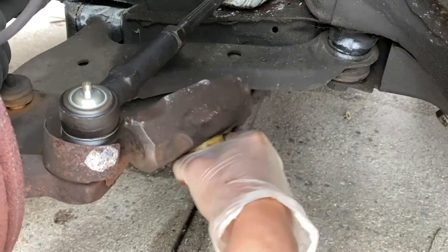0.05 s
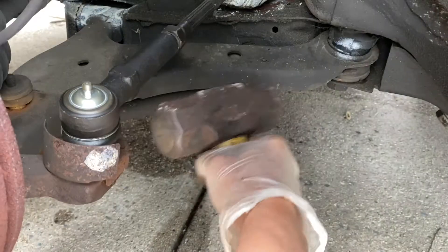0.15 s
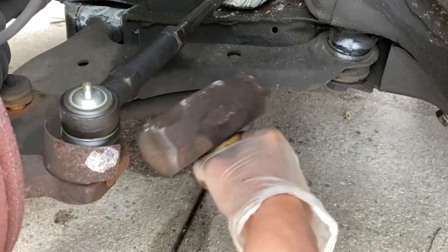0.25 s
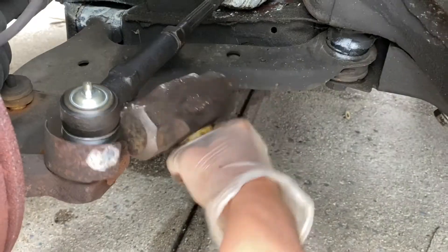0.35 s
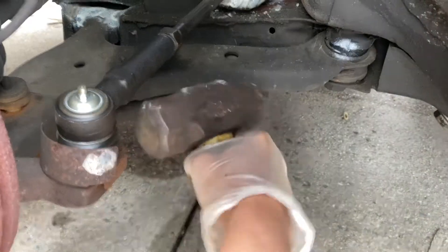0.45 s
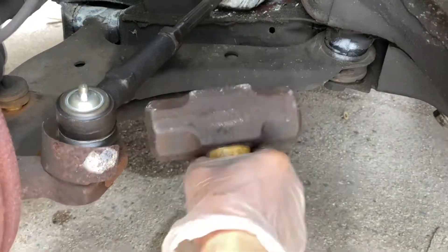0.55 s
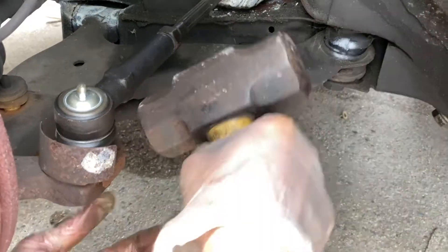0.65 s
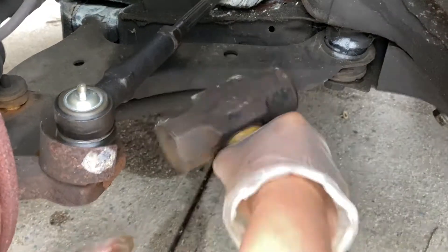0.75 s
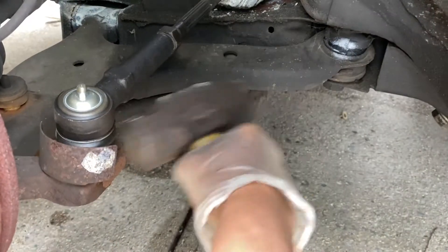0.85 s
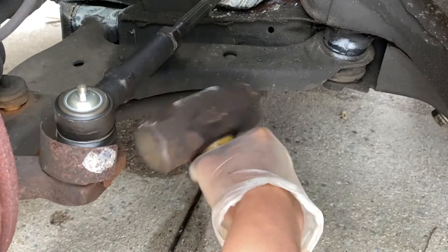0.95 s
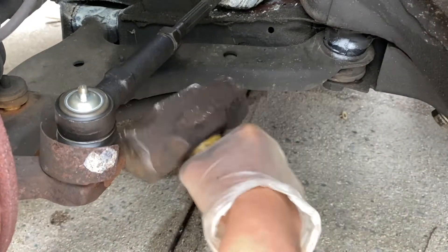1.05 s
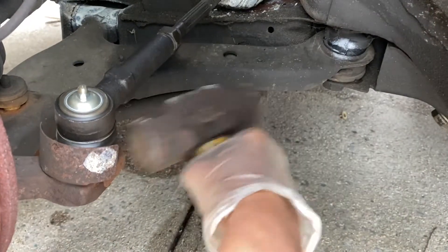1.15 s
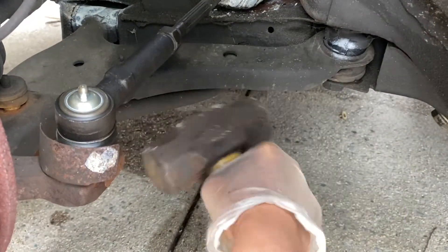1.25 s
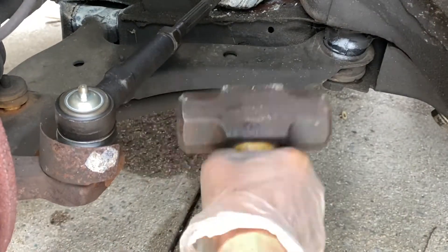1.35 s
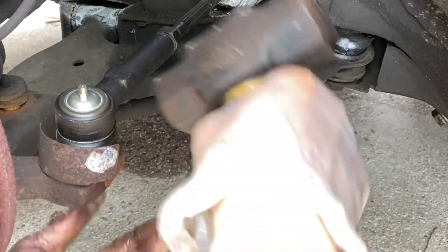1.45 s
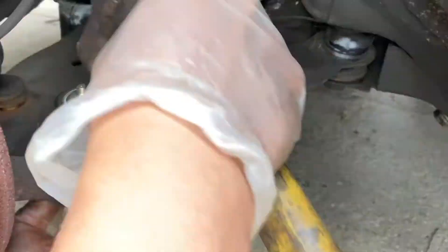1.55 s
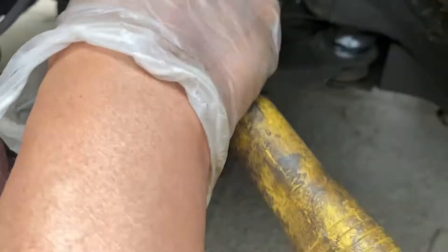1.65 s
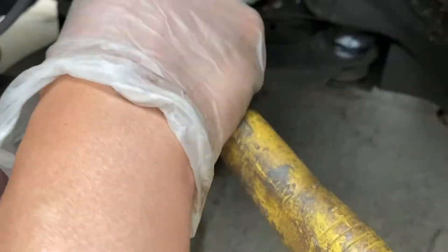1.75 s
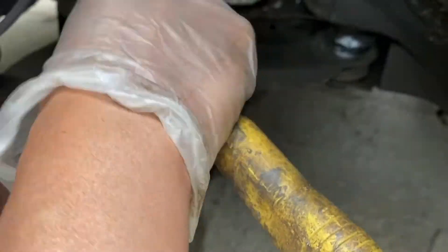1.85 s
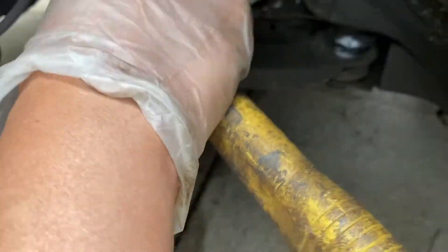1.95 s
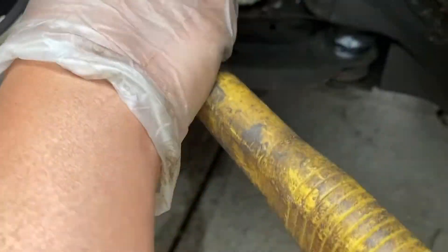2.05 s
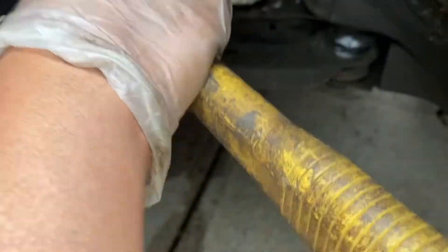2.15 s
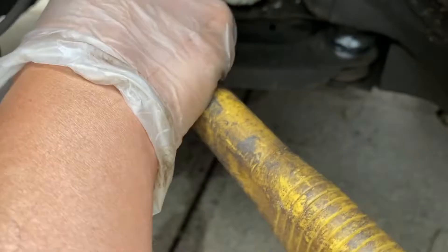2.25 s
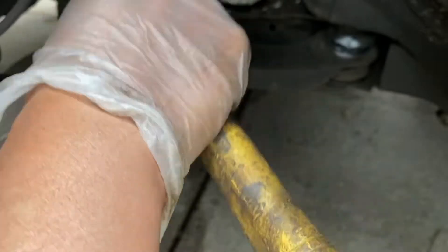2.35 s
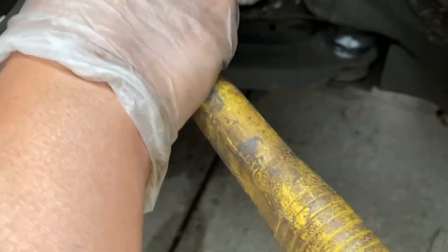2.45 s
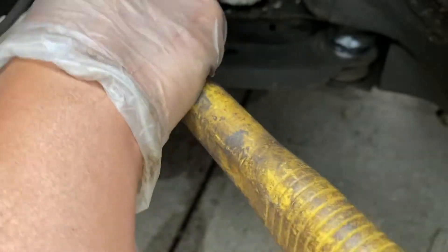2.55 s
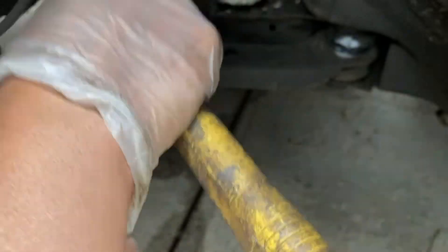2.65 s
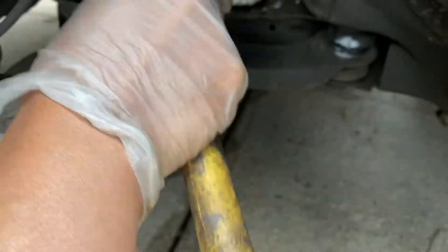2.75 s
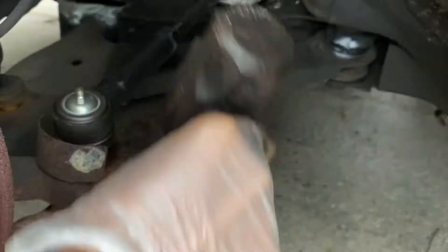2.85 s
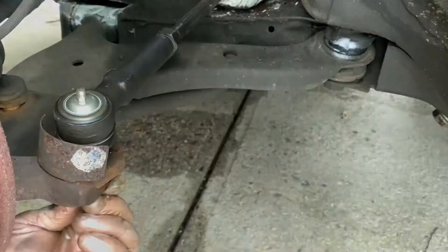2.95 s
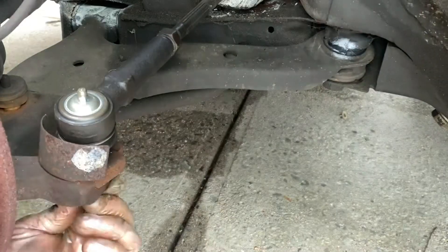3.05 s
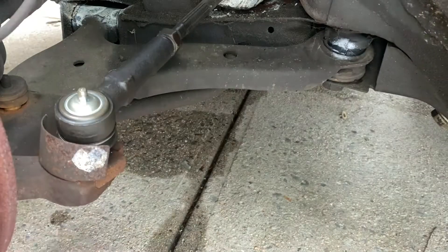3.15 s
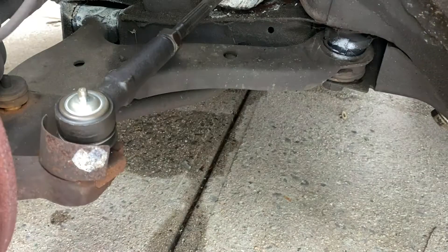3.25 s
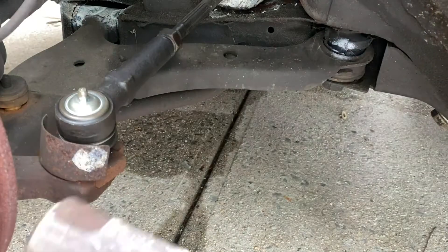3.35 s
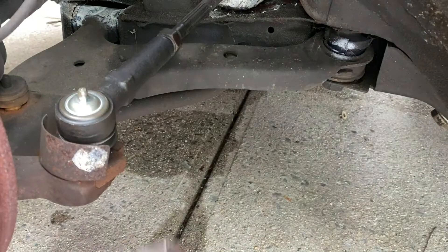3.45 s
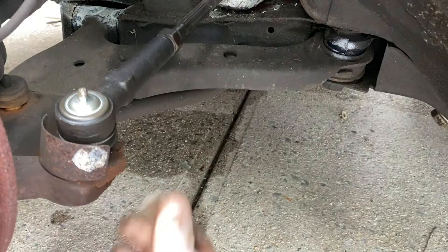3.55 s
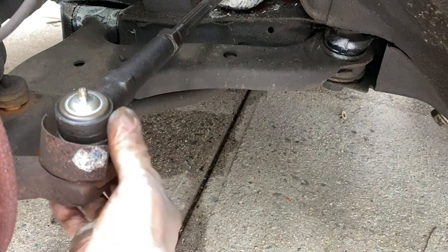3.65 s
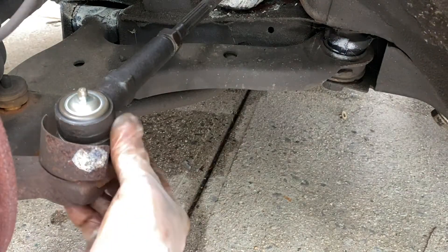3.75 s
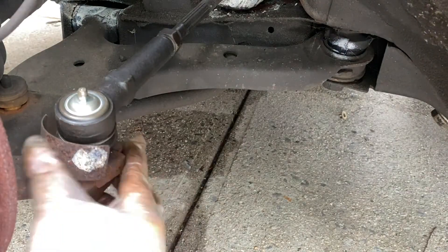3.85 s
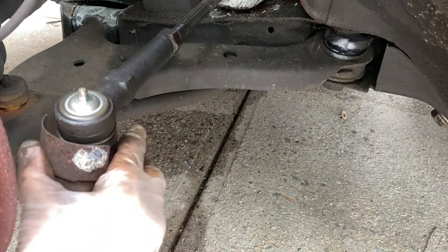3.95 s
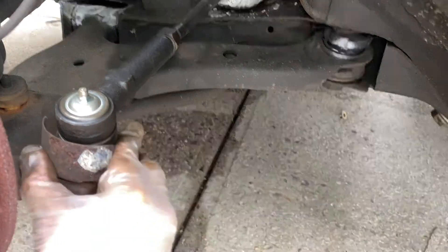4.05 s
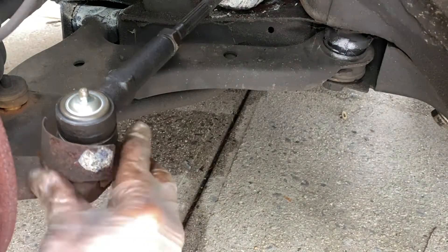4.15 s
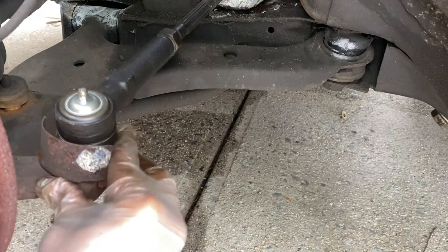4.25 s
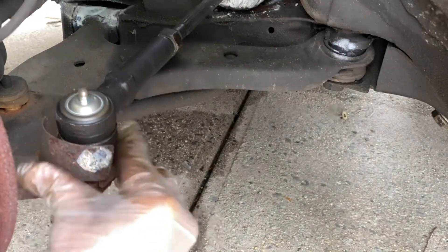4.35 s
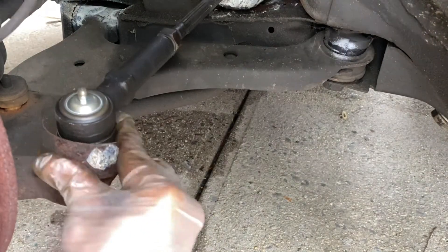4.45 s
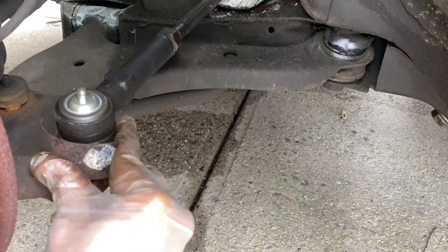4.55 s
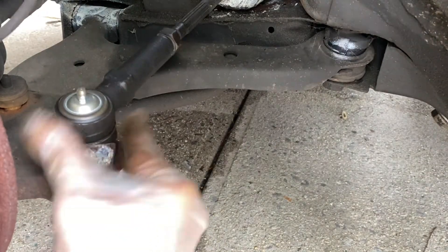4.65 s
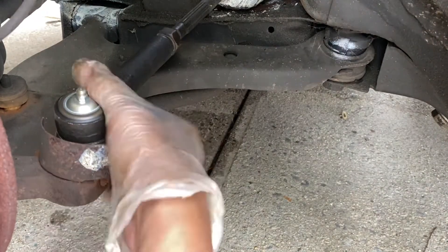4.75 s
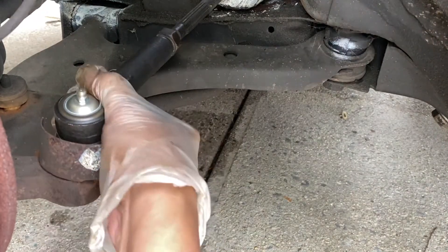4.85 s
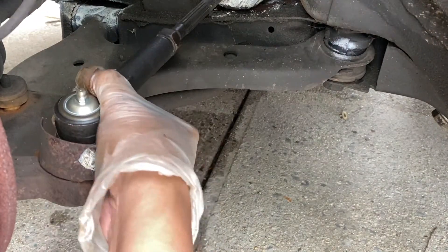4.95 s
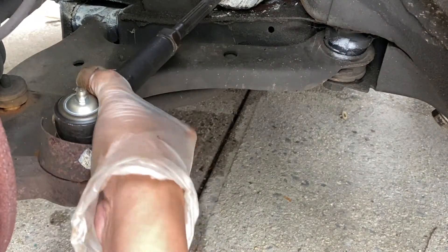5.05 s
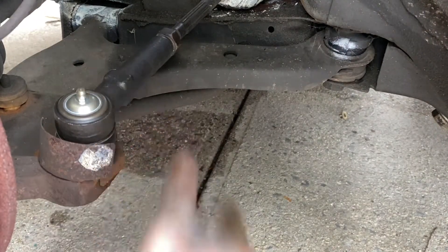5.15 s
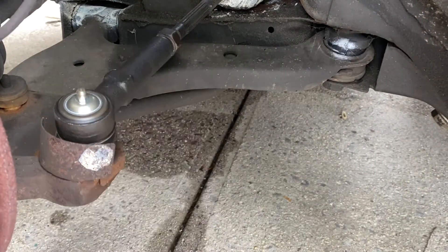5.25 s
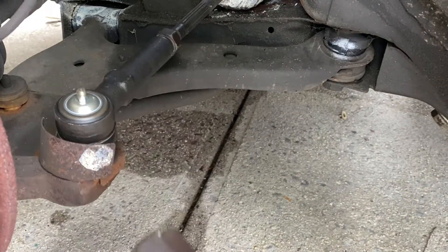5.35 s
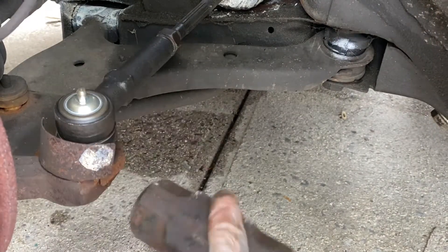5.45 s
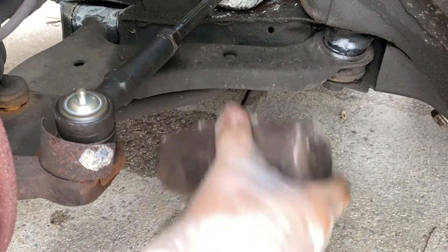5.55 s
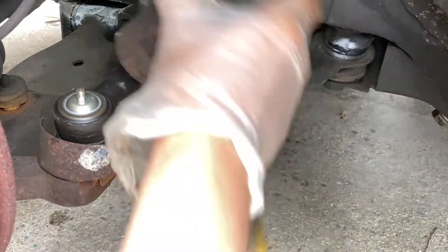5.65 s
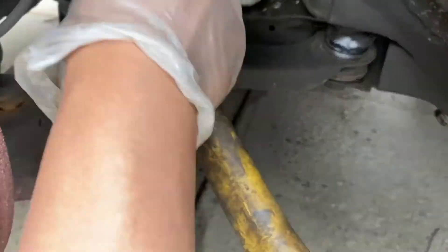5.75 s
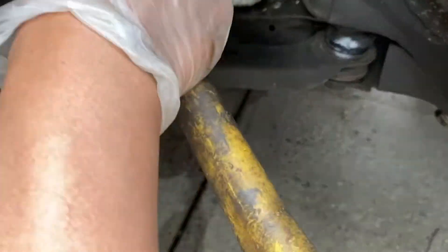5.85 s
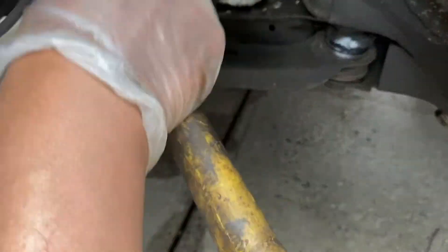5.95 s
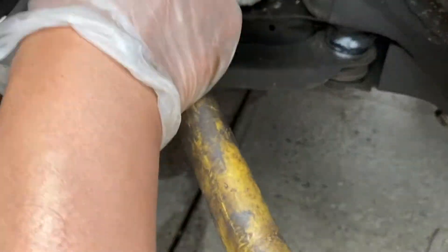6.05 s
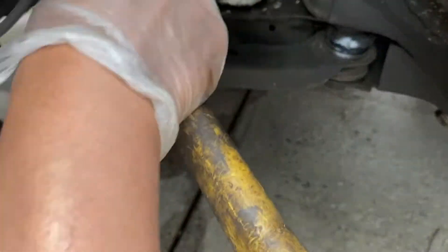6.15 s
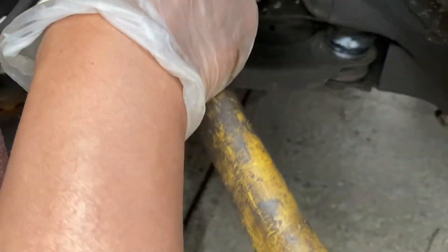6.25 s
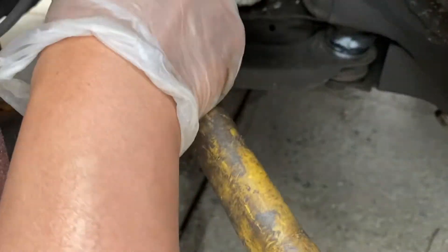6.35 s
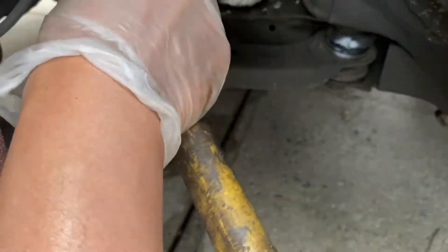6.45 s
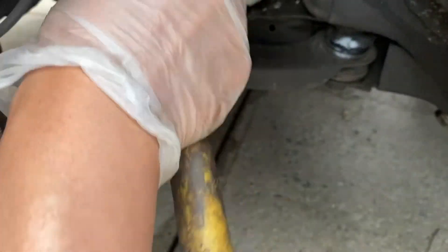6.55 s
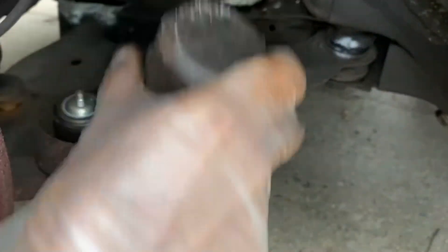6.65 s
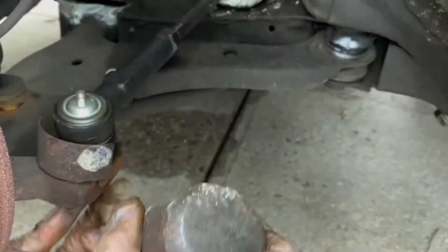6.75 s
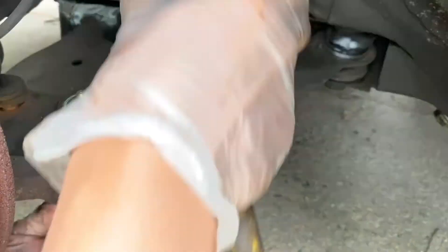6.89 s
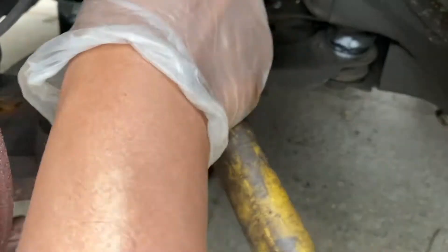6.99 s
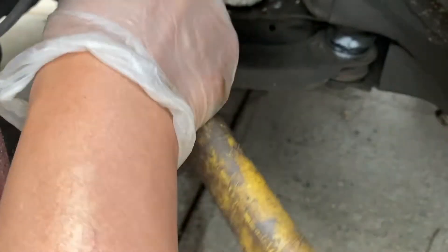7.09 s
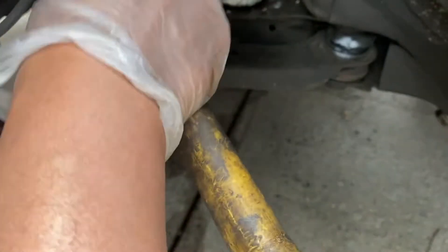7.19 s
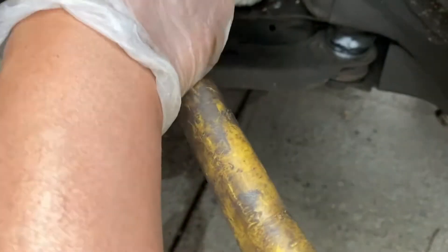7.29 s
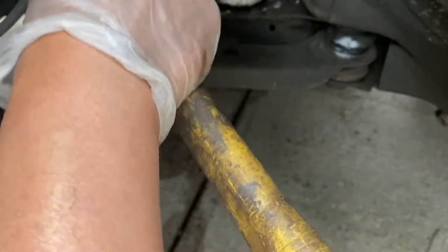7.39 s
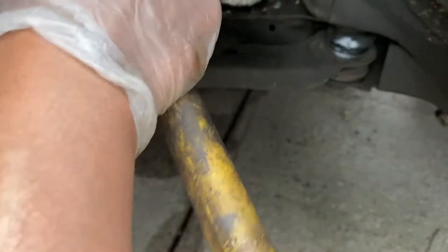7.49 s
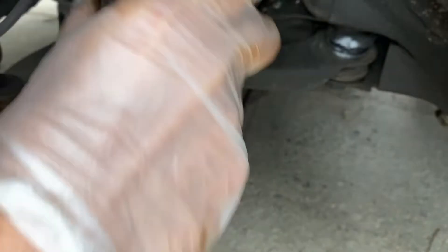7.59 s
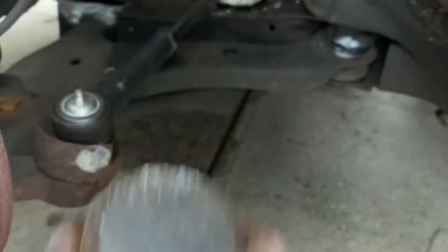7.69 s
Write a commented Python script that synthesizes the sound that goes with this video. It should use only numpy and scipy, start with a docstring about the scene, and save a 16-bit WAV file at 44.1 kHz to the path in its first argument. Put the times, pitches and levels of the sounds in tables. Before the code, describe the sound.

Hard bright clangs of hammer on a heavy steel car part open the scene in two groups of three, distorting the close microphone. Quick light taps mixed with dull, chattering knocks come next. Then the tapping stops for quiet glove rustle, short rubbery rubs and tiny squeaks. A dull knock leads into four light taps, soft handling, and three last taps over faint room air.

```python
"""In a garage, beside a car's wheel well: a small sledge hammer on the steering knuckle, very close to the microphone.
Six hard ringing blows come first, then runs of light taps with a few dull, chattering knocks.
Damped modes ring the steel, noise bursts give the crack, and the wheel well adds a short dense tail.
Around the runs a gloved hand rubs and feels the joint, made of swells of grainy noise, pops and faint squeaks.
Quiet coloured noise is the room; the microphone clips the loud peaks, and the sound cuts out once, briefly."""
import sys
import numpy as np
from scipy import signal
from scipy.fft import rfft, irfft
from scipy.io import wavfile
from scipy.ndimage import uniform_filter1d

SR = 44100
rng = np.random.default_rng(int(sys.argv[2]) if len(sys.argv) > 2 else 0)


def wav_out(sig):
    """Save sig, one row per channel (or a flat mono array), as 16-bit PCM at SR to the path in sys.argv[1]."""
    wavfile.write(sys.argv[1], SR, np.round(np.clip(np.atleast_2d(sig).T, -1, 1) * 32767).astype(np.int16))


N = 340496
TIME = np.arange(N) / SR
AGE = TIME[:SR // 3]  # seconds since a contact
MIDDLE = AGE[-1] / 2  # where a stroke peaks, in seconds


def undb(db):
    """Decibels to gain."""
    return 10 ** (np.asarray(db) / 20)


def noise(t):
    """White noise as long as t."""
    return rng.standard_normal(len(t))


def colour(x, points, treble_db=0, bass_db=0):
    """Give a white signal a spectrum at the same power, then shelve its treble and bass."""
    f = np.fft.rfftfreq(len(x), 1 / SR) + 1  # 1 Hz up, to keep the logarithm finite
    hz, db = np.transpose(points)
    gain = undb(np.interp(np.log(f), np.log(hz), db))
    gain /= np.sqrt(np.mean(gain ** 2))
    treble_shelf_db = treble_db * f ** 2 / (f ** 2 + 4500 ** 2)
    bass_shelf_db = bass_db / (1 + (f / 800) ** 2)
    return irfft(rfft(x) * gain * undb(treble_shelf_db + bass_shelf_db), len(x))


def grains(t, spread_db):
    """Dense tiny slips of very unequal size; rms 1."""
    sizes_db = spread_db * np.repeat(noise(t), 12)[:len(t)]  # each size holds for 12 samples
    x = noise(t) * undb(sizes_db)
    return x / np.std(x)


def swell(width, t=AGE - MIDDLE):
    """A rounded rise and fall that peaks at t = 0, halfway along a stroke."""
    return np.exp(-np.abs(t / width) ** 1.6)


def fade(t60):
    """Exponential decay after a contact, down 60 dB at t60 seconds."""
    return np.exp(-np.log(1000) * AGE / max(t60, 1e-3))


def onset(rise_s):
    """A rounded start that approaches full level over a few times rise_s."""
    return 1 - np.exp(-AGE / rise_s)


def ring(modes, scatter_db, detune):
    """Decaying modes; each contact lands on another spot and shares its energy out differently."""
    out = np.zeros(len(AGE))
    for hz, db, t60 in modes:
        level_chance, pitch_chance, phase = rng.standard_normal(3)
        cycles = hz * (1 + detune * pitch_chance) * AGE + phase
        out += undb(db + scatter_db * level_chance) * fade(t60) * np.sin(2 * np.pi * cycles)
    return out


def excite(x, modes, t60, contact_s=0.00064):
    """Drive a set of modes with x through a soft contact, at equal power."""
    timed_modes = [(hz, db, share * t60) for hz, db, share in modes]
    response = ring(timed_modes, scatter_db=1.5, detune=0) * onset(contact_s)
    return signal.fftconvolve(x, response / np.linalg.norm(response))[:len(x)]


def add(track, s, x):
    """Mix x into the track at time s."""
    i = max(int(s * SR), 0)
    track[i:i + len(x)] += x[:N - i]


# The still air of the garage. Each row: frequency in Hz, relative density in dB per Hz.
ROOM_SPECTRUM = [(25, -5), (60, 4.5), (150, 5.5), (300, 5.5), (600, 0), (1000, 1.5), (1700, 0.5),
                 (3000, -6), (4500, -13.5), (7000, -19.5), (11000, -25.5), (16000, -31)]


def room_air(level_db=-67.5):
    """Steady room noise, strongest in the bass and low middle."""
    return undb(level_db) * colour(noise(TIME), ROOM_SPECTRUM)


# Crinkling of the thin glove. Each row: frequency in Hz, relative density in dB per Hz.
CRINKLE_SPECTRUM = [(200, -8), (500, 3.5), (1000, 0), (3000, -3.5), (4500, -12.5), (7500, -13),
                    (11000, -20.5), (15500, -36.5)]
# Soft push on the joint. Each row: frequency in Hz, relative density in dB per Hz.
PUSH_SPECTRUM = [(20, -33), (50, 0.5), (100, 3.5), (200, 0), (400, -16.5), (1500, -34.5)]
# Modes of the knuckle and its arm. Each row: nominal frequency in Hz, mean level in dB,
# share of the contact's t60.
KNUCKLE_MODES = [(447, -17.5, 0.43), (602, -16, 0.62), (957.6, -16, 1), (1347.4, -19.5, 1),
                 (1450.6, -17, 0.99), (1716, -12, 0.74), (2072, -15.5, 0.73), (2753, -16.5, 0.53),
                 (3450, -10.5, 0.51), (3537, -13, 0.58), (4050, -13, 0.26), (4426, -21, 0.34),
                 (4827, -21.5, .7), (7000, -18.5, 0.35), (11120, -17.5, 0.31)]
# Movements of the hand. Each row: peak time in seconds, swell and fade time in seconds,
# crinkle level in dB, crinkle treble in dB, push level in dB.
HAND_MOVES = [(0.55, 0.031, -79.5, 15, -80), (2.31, 0.022, -66, 15, -70), (2.791, 0.042, -76.5, 12, -67),
              (2.939, .04, -69.5, 7, -74.5), (3.2, .03, -63.5, 4.5, -67), (3.38, 0.073, -65.5, 9.5, -59),
              (3.471, 0.041, -64.5, 4.5, -63), (3.855, 0.015, -59, 7, -50.5), (3.99, 0.29, -60.5, -7, -63),
              (4.889, .025, -66, 5.5, -74.5), (5.325, 0.014, -61, -2, -64.5),
              (5.378, 0.021, -57.5, 1.5, -56.5), (5.44, 0.027, -62, -1, -60), (6.781, .03, -69, 5, -74),
              (7.15, 0.19, -63, -12, -70), (7.544, 0.035, -57.5, -10, -58), (7.69, 0.12, -61.5, -3.5, -64)]


def handling(flutter_hz=35, flutter_db=2, steel_db=-13, steel_t60=0.099):
    """As the hand moves, the glove crinkles in uneven spurts and nudges the joint; the steel sings faintly."""
    knots = np.arange(0, TIME[-1], 1 / flutter_hz)
    spurts = np.interp(TIME, knots, rng.standard_normal(len(knots)))
    slips = undb(flutter_db * spurts) * grains(TIME, spread_db=5)
    crinkle = colour(slips, CRINKLE_SPECTRUM)
    high_pass = signal.butter(1, 4500, "high", fs=SR, output="sos")
    treble = signal.sosfiltfilt(high_pass, crinkle)
    bump = colour(noise(TIME), PUSH_SPECTRUM)
    rustle, push = np.zeros(N), np.zeros(N)
    for s, width, db, treble_db, push_db in HAND_MOVES:
        motion = swell(width, TIME - s)
        rustle += undb(db) * motion * (crinkle + (undb(treble_db) - 1) * treble)
        push += undb(push_db) * motion * bump
    steel = undb(steel_db) * excite(rustle, KNUCKLE_MODES, steel_t60)
    return rustle + push + steel


def twist(start_s=4.13, count=6, gap_s=0.058, quickening=0.88):
    """The hand twists the joint: the slips crowd together and brighten as the grip gives way."""
    width_s, level_db, treble_db, brightening_db = 0.021, -37.5, -0.5, 0.55
    strokes, s = [], start_s
    for k in range(count):
        strokes.append((s, width_s, level_db, treble_db + brightening_db * k))
        s += gap_s * quickening ** k
    return strokes


# Single strokes of the glove on the joint. Each row: peak time in seconds, swell and fade time in seconds,
# level in dB, treble in dB.
GLOVE_STROKES = [(3.127, 0.031, -36, 2.5), (3.168, 0.012, -37, 6), (4.46, 0.0059, -51.5, 3),
                 (4.528, 0.013, -45, 4), (4.791, 0.0073, -55, 3), (4.842, 0.012, -45, 7),
                 (5.16, 0.013, -47, 8.5), (5.512, 0.011, -49, 23), (6.426, 0.0096, -52, 5),
                 (6.725, 0.013, -56, -1)]
# Rubber rubbing on steel. Each row: frequency in Hz, relative density in dB per Hz.
RUB_SPECTRUM = [(40, -17), (130, 5.5), (250, 7.5), (400, 5), (650, -1.5), (1000, -6.5), (2000, -10),
                (2800, -9), (3700, -16), (5000, -26), (9000, -29), (15500, -42)]


def glove():
    """Short strokes of rubber slipping over steel, each a swell of tiny slips."""
    out = np.zeros(N)
    for s, width, db, treble_db in list(GLOVE_STROKES) + twist():
        slips = swell(width) * grains(AGE, spread_db=3.5)
        # a brighter stroke also has less bass
        stroke = colour(slips, RUB_SPECTRUM, treble_db, bass_db=-0.75 * treble_db)
        add(out, s - MIDDLE, undb(db) * stroke)
    return out


def judder(s=3.145, width=0.013, db=-22, slip_hz=172, jitter=0.1, pop_t60=0.018):
    """The glove grips and lets go a few times in a row; each slip gives a hollow, damped pop."""
    slips = np.zeros(len(AGE))
    times = np.cumsum(1 + jitter * rng.standard_normal(80)) / slip_hz
    slips[(times[times < AGE[-1]] * SR).astype(int)] = 1
    # neighbouring modes swing against each other, so the pop has little bass
    pop = np.zeros(len(AGE))
    for sign, hz in ((1, 300), (-1, 510), (1, 680)):
        pop += sign * np.sin(2 * np.pi * hz * AGE) * fade(pop_t60)
    out = np.zeros(N)
    add(out, s - MIDDLE, undb(db) * signal.fftconvolve(slips * swell(width), pop))
    return out


# Small crisp ticks of the fingers on the joint. Each row: start in seconds, level in dB, t60 in seconds,
# treble in dB.
FINGER_TICKS = [(1.583, -55.5, 0.061, 23), (2.916, -54, 0.07, 14.5), (3.212, -50, 0.059, 1),
                (4.038, -55, 0.049, 9.5), (4.392, -51.5, 0.013, 10), (5.402, -47, 0.02, 1)]


def ticks():
    """The glove snaps free of an edge: a fading burst of coloured noise."""
    out = np.zeros(N)
    for s, db, t60, treble_db in FINGER_TICKS:
        add(out, s, undb(db) * colour(noise(AGE), CRINKLE_SPECTRUM, treble_db) * fade(t60))
    return out


# Faint squeaks of rubber on steel. Each row: peak time in seconds, swell and fade time in seconds,
# mean pitch in Hz, level in dB.
RUBBER_SQUEAKS = [(3.46, .03, 903, -63), (3.67, .025, 915, -65), (3.835, 0.037, 925, -61)]


def squeaks(wobble=0.013, rolloff_db=-1.6, count=8):
    """A fingertip sticks and slips fast enough to sing, in harmonics of a wavering pitch."""
    out = np.zeros(N)
    for s, width, hz, db in RUBBER_SQUEAKS:
        drift = uniform_filter1d(noise(AGE), size=300)
        pitch = hz * (1 + wobble * drift / np.std(drift))
        phase = 2 * np.pi * np.cumsum(pitch) / SR
        tone = sum(undb(rolloff_db * k) * np.sin((k + 1) * phase) for k in range(count))
        add(out, s - MIDDLE, undb(db) * swell(width) * tone / np.std(tone))
    return out


# Low thumps as the microphone overloads at two hard blows and two dull knocks. Each row: start in seconds,
# level in dB.
OVERLOAD_THUMPS = [(1.009, -19), (1.164, -11.5), (1.4732, -29), (5.7335, -31.5)]
# Low tones of a thump. Each row: frequency in Hz, level in dB, t60 in seconds.
THUMP_MODES = [(48, -2.5, 0.06), (132, 1, 0.03)]


def thumps():
    """The microphone's overload adds a low thump under some contacts, as quickly damped low sines."""
    out = np.zeros(N)
    thump = sum(undb(db) * np.sin(2 * np.pi * hz * AGE) * fade(t60) for hz, db, t60 in THUMP_MODES)
    for s, db in OVERLOAD_THUMPS:
        add(out, s, undb(db) * thump)
    return out


# The dull body chattering after a contact. Each row: peak of the first burst in seconds, end of the series
# in seconds, gap between bursts in seconds, level in dB.
CHATTER_RUNS = [(1.567, 1.641, 0.0295, -44.5), (2.149, 2.215, 0.045, -47.5)]
# Modes of a dull knock. Each row: frequency in Hz before the pitch ratio, level in dB,
# share of the contact's t60.
DULL_MODES = [(623.4, -25, 4.8), (813, -21, 1.2), (1110, -23, 0.61), (1390, -6, 1.28), (1462, -10.5, 2.48),
              (1650, 0.5, 1.3), (2098, -9.5, 1.2), (2980, -22, 2.1), (4460, -24.5, 0.46)]


def chatter(t60=0.01, pitch=0.84, burst_s=0.011):
    """Evenly spaced bursts of tiny contacts keep the dull modes buzzing for a moment."""
    out = np.zeros(N)
    modes = [(hz * pitch, db, share) for hz, db, share in DULL_MODES]
    for start, end, gap, db in CHATTER_RUNS:
        for s in np.arange(start, end, gap):
            contacts = swell(burst_s) * grains(AGE, spread_db=8.0)
            add(out, s - MIDDLE, undb(db) * excite(contacts, modes, t60))
    return out


# Dull knocks with one rebound each. Each row: start in seconds, strength in dB, t60 in seconds before the
# mode's share, pitch ratio, time to the rebound in seconds.
DULL_KNOCKS = [(1.4746, -2, 0.015, 0.97, 0.0092), (1.521, -9, 0.0099, .97, 0.005),
               (1.5377, -18.5, 0.016, .93, 0.006), (2.3971, -1.5, 0.018, 1.001, 0.0097),
               (2.5076, -7.5, .013, 0.95, 0.0072), (4.271, -20.5, 0.01, 0.825, 0.005),
               (5.4023, -37.5, 0.0089, 1.7, 0.00198), (5.7334, 0.5, 0.017, 1.03, 0.0038),
               (5.7837, -37.5, 0.028, 0.41, 0.004)]
# Hiss of a dull contact. Each row: frequency in Hz, relative density in dB per Hz.
KNOCK_HISS_SPECTRUM = [(40, -20.5), (200, -17), (700, 25.5), (1500, 15.5), (3000, 11), (6000, -4),
                       (11000, -10.5), (16000, -26.5)]


def knocks(hiss_db=-19, hiss_t60=0.055, contact_s=0.00051, bounce_db=-14):
    """Dull knocks start a cluster of low modes together, then rebound once."""
    out = np.zeros(N)
    for s, db, t60, pitch, bounce_s in DULL_KNOCKS:
        body = np.zeros(len(AGE))
        for hz, mode_db, share in DULL_MODES:
            body += undb(mode_db) * np.sin(2 * np.pi * hz * pitch * AGE) * fade(share * t60)
        hiss = undb(hiss_db) * colour(noise(AGE), KNOCK_HISS_SPECTRUM) * fade(hiss_t60)
        knock = undb(db) * (body + hiss) * onset(contact_s)
        add(out, s, knock)
        add(out, s + bounce_s, undb(bounce_db) * knock)
    return out


# The dense tail, before shelving. Each row: frequency in Hz, relative density in dB per Hz.
TAIL_SPECTRUM = [(40, -11), (150, -8), (320, -11), (560, 5), (800, 0.5), (1400, 0.5), (2000, 1.5),
                 (2500, -2), (3700, 1), (5200, -10), (8000, -5.5), (10500, -14.5), (12500, -20.5),
                 (16000, -23.5)]


def garage(late_db=-44, treble_db=-14, t60=0.32):
    """Faint, dull reverberation of the space round the car, as decaying noise."""
    return undb(late_db) * colour(noise(AGE), TAIL_SPECTRUM, treble_db) * fade(t60)


# Hammer on steel. Each row: start in seconds, strength in dB, treble in dB, squareness from 0 glancing to
# 1 square, nominal clank of the struck spot in Hz, clank level in dB relative to the strength.
HAMMER_BLOWS = [(0.0140, -8, -8, 0.84, 1300, -15), (0.1801, -8, 4, 1, 1560, -10.5),
                (0.3393, -5, -2, 0.92, 1260, -12.5), (0.8628, -6, -4, 1, 1268, -10.5),
                (1.009, -5.5, 1, 1, 515, -8), (1.164, -4.5, 0.5, 0.9, 1523, -15),
                (1.7007, -16.5, -12, .05, 1750, -1), (1.8495, -19, -16.5, 0.029, 1700, 1),
                (1.9731, -16.5, -15, .05, 1687, -2.5), (2.087, -20, -4.5, .1, 1463, 0.5),
                (2.219, -17.5, -6, 0.064, 10630, 2), (2.370, -19, -1, .12, 10710, 2),
                (2.5229, -18, -5, .03, 10520, 3.5), (2.661, -17, -10, .03, 10690, 5),
                (5.9635, -15, -8, 0.06, 606, -8), (6.1531, -12.5, -13, .05, 1618, -2),
                (6.3057, -13, -11, 0.17, 1580, -6.5), (6.4516, -16.5, -5.5, 0.062, 1475, -2),
                (7.0496, -19, -20.5, .05, 944, 4), (7.2081, -13.5, -15, 0.058, 3850, -1),
                (7.3614, -14, -5, 0.083, 614, -4.5)]
# Modes that a square blow wakes. Each row: nominal frequency in Hz, mean level in dB before the ring level,
# t60 in seconds.
SQUARE_RING_MODES = [(1285, -10.5, .085), (1480, -19, .1), (2095, -11, .055), (3030, -8, .03),
                     (4289, -7, .03), (4689, -8.5, .03), (5595, -5, .035), (7490, -8, .04),
                     (8089, -1.5, .058), (8556, 2, .04), (9335, -10.5, .08), (9385, -14, .08),
                     (9740, -14, .04)]
# Crack of the contact, before shelving. Each row: frequency in Hz, relative density in dB per Hz.
CRACK_SPECTRUM = [(40, -21.5), (330, -18.5), (600, -6), (1500, 0.5), (2500, -4.5), (4000, 0.5), (7000, 9.5),
                  (10500, 4.5), (13000, -1.5), (16000, -19)]
# The two extremes of contact, relative to a blow's strength. Each row: ring in dB, crack in dB, knuckle in dB,
# bass of the tail in dB, treble of the tail in dB, t60 in seconds.
GLANCING_CONTACT = (-31.5, 9.5, 1.5, -1.5, -1, 0.06)
SQUARE_CONTACT = (0.5, 6, -1.5, -3, -2, 0.0842)


def hammer(crack_t60=0.021, clank_t60=0.034, clank_spread=0.046, tail_db=-1, build_s=0.0012,
           contact_s=0.00056, spot_scatter_db=2):
    """Blows crack, ring the knuckle and scatter in the wheel well; square ones ring, glancing ones clank."""
    out = np.zeros(N)
    for s, db, treble_db, squareness, clank_hz, clank_db in HAMMER_BLOWS:
        square = np.clip(squareness, 0, 1)
        contact = square * np.array(SQUARE_CONTACT) + (1 - square) * np.array(GLANCING_CONTACT)
        ring_db, crack_db, knuckle_db, bass_db, tail_treble_db, t60 = contact
        crack = undb(crack_db) * colour(noise(AGE), CRACK_SPECTRUM, treble_db) * fade(crack_t60)
        knuckle = [(hz, mode_db, share * t60) for hz, mode_db, share in KNUCKLE_MODES]
        body = undb(knuckle_db) * ring(knuckle, spot_scatter_db, detune=0.012)
        bright = undb(ring_db) * ring(SQUARE_RING_MODES, spot_scatter_db, detune=0.0012)
        # the struck spot favours a few close, quickly damped modes
        spot = [(clank_hz * (1 + k * clank_spread), clank_db - 5 * abs(k), clank_t60) for k in (-1, 0, 1)]
        clank = ring(spot, scatter_db=0.5, detune=0.0046)
        tail_noise = colour(noise(AGE), TAIL_SPECTRUM, treble_db + tail_treble_db, bass_db)
        tail = undb(tail_db) * tail_noise * fade(t60)
        # reflections need a moment to build up
        reflections = (tail + garage()) * onset(build_s)
        blow = crack + body + bright + clank + reflections
        add(out, s, undb(db) * blow * onset(contact_s))
    return out


def scene():
    """The steady air of the garage, the hand on the joint, and the hammer."""
    hand = handling() + glove() + judder() + ticks() + squeaks()
    tool = thumps() + chatter() + knocks() + hammer()
    return (room_air() + hand + tool)[None]


# A brief silence just after the sixth blow begins: start in seconds, end in seconds.
SILENCE_S = (1.1708, 1.2045)


def record(dry, clip_level=0.28, low_cut_hz=35, top_hz=16000):
    """The close microphone clips hard; the sound cuts out briefly in the sixth blow; bass and top are cut."""
    live = (TIME < SILENCE_S[0]) | (TIME > SILENCE_S[1])
    x = np.clip(dry, -clip_level, clip_level) * live
    low_cut = signal.butter(1, low_cut_hz, "high", fs=SR, output="sos")
    top_cut = signal.ellip(8, 0.2, 70, top_hz, fs=SR, output="sos")
    return signal.sosfilt(top_cut, signal.sosfilt(low_cut, x))


dry = scene()
out = record(dry)
wav_out(out)
```